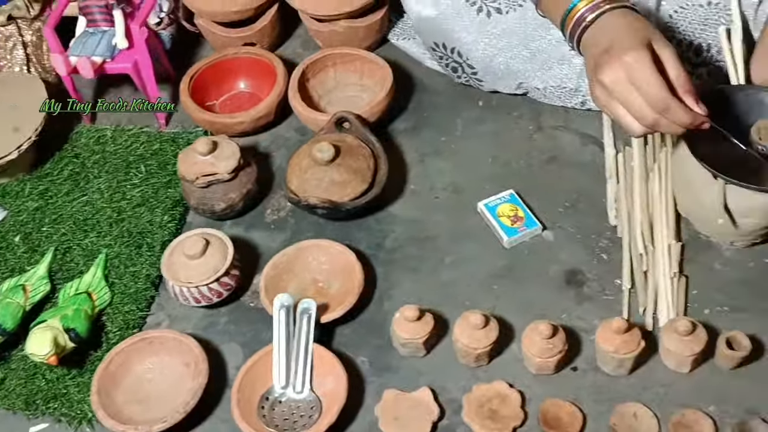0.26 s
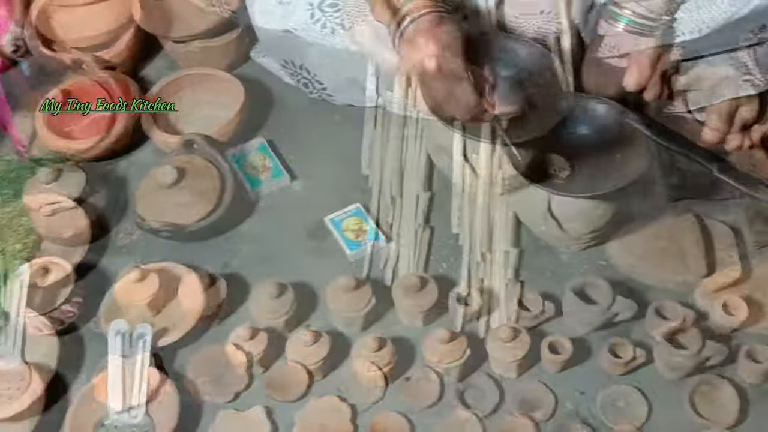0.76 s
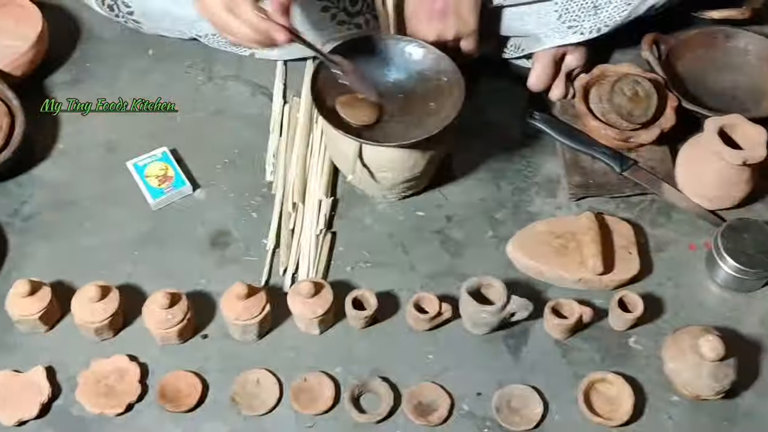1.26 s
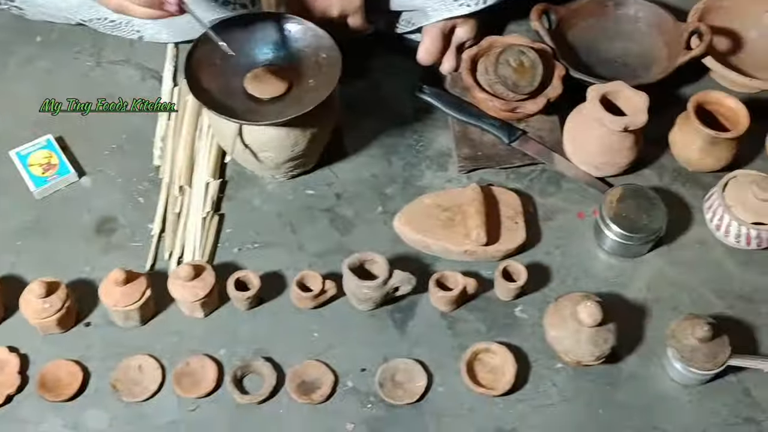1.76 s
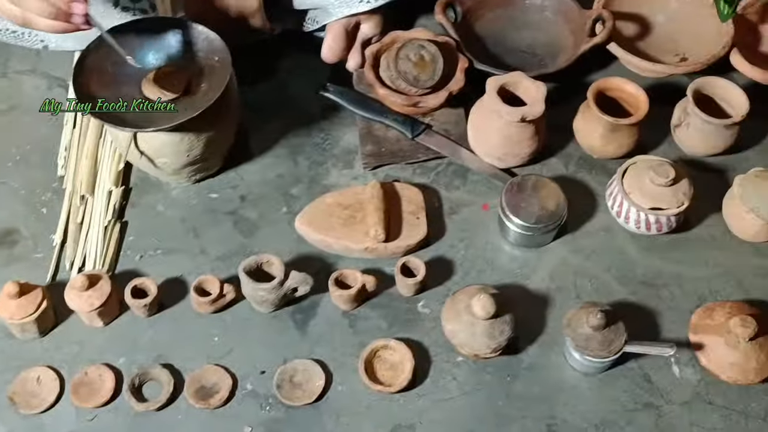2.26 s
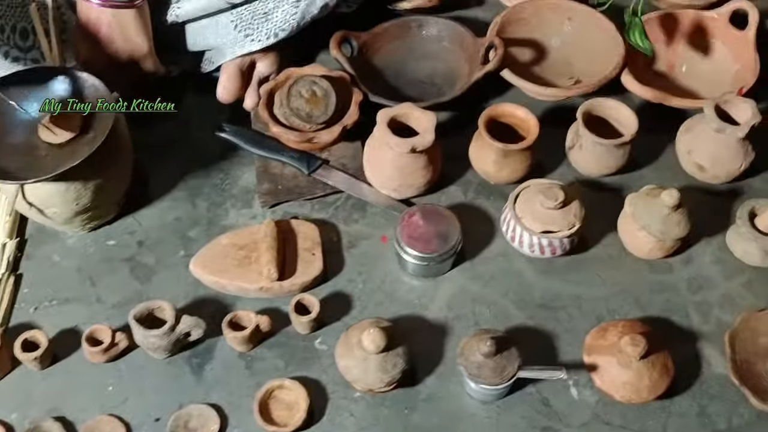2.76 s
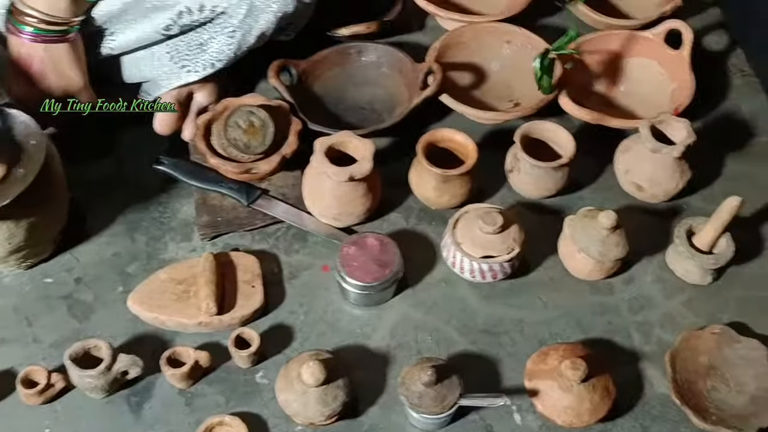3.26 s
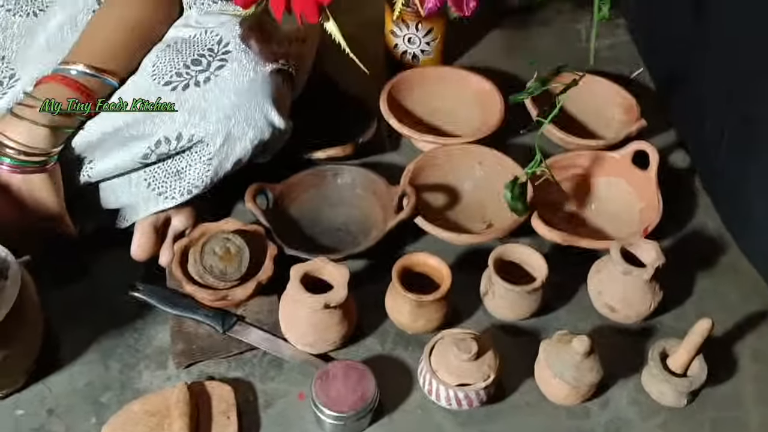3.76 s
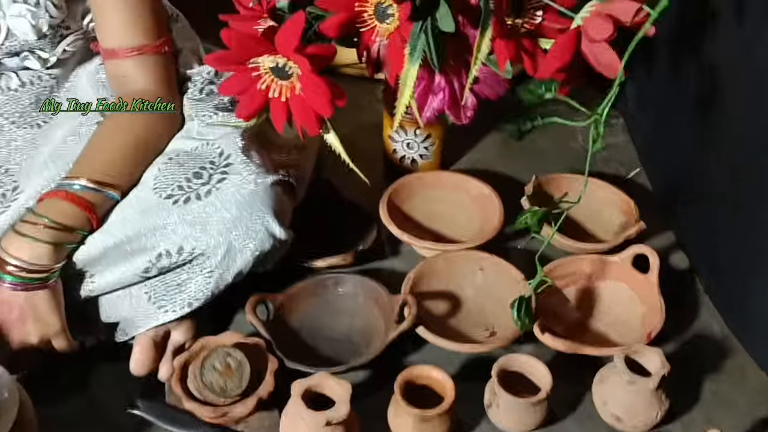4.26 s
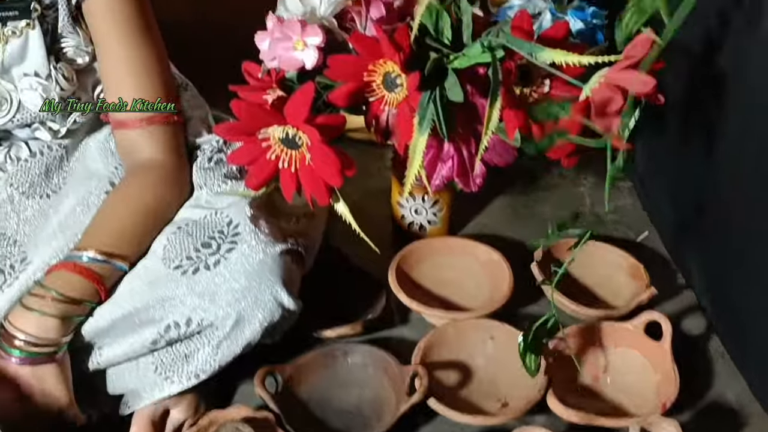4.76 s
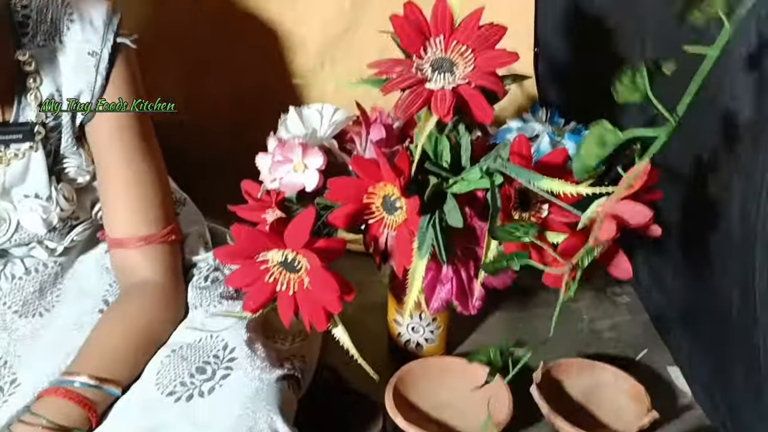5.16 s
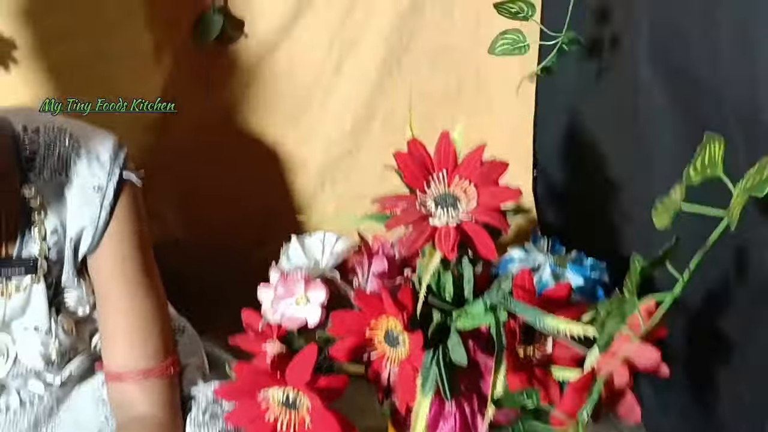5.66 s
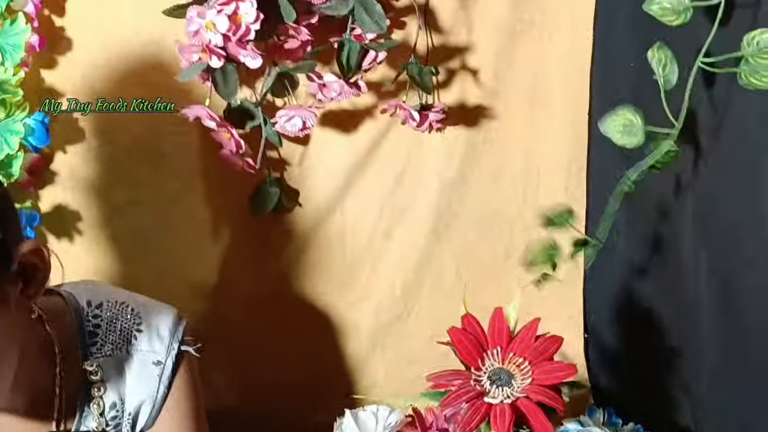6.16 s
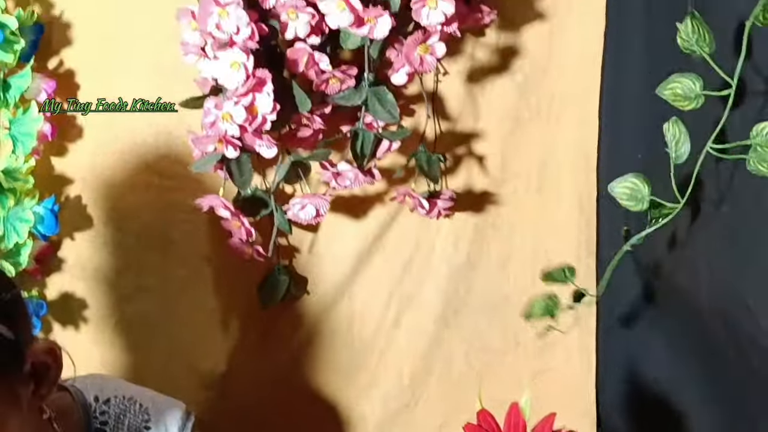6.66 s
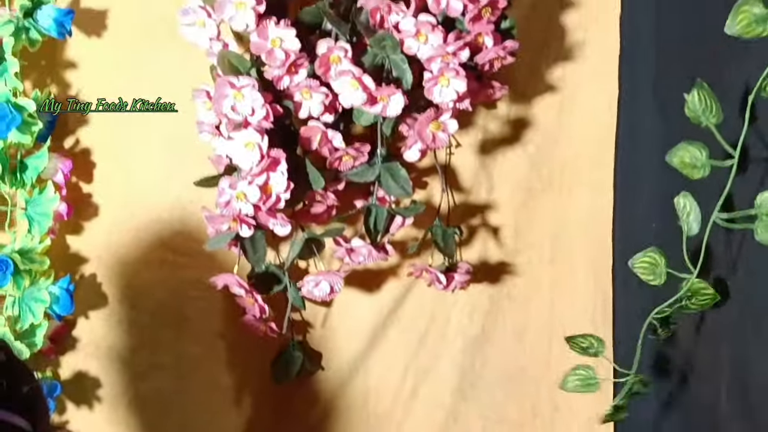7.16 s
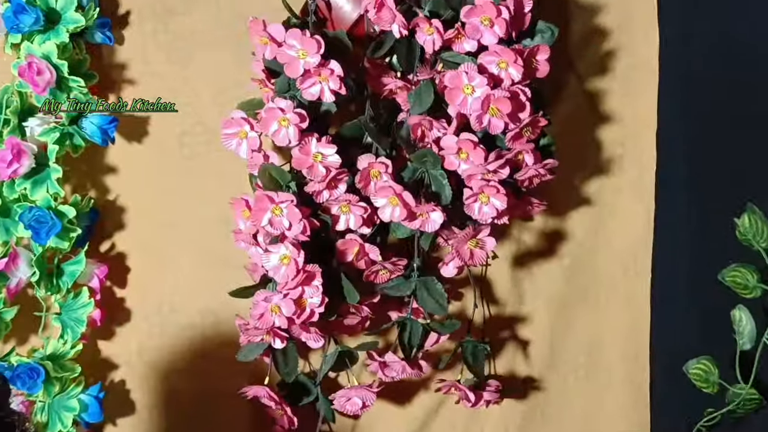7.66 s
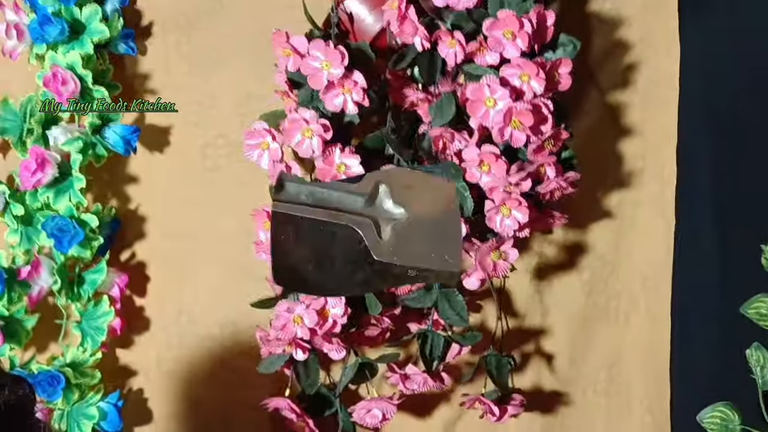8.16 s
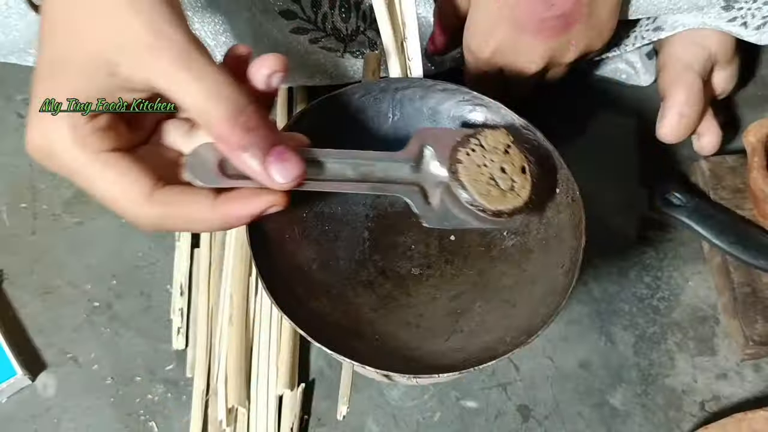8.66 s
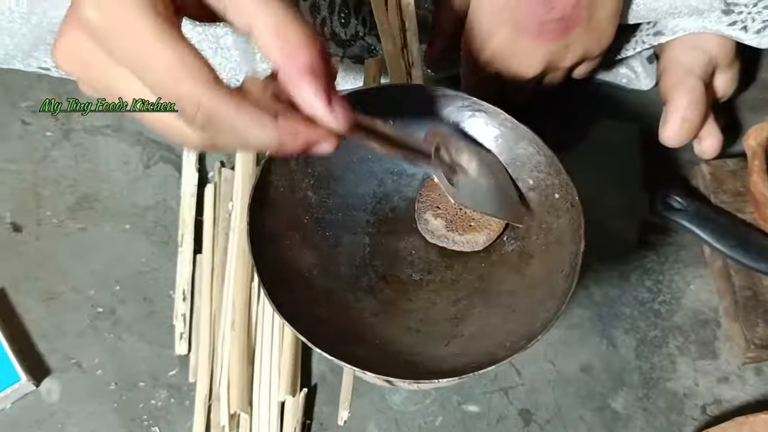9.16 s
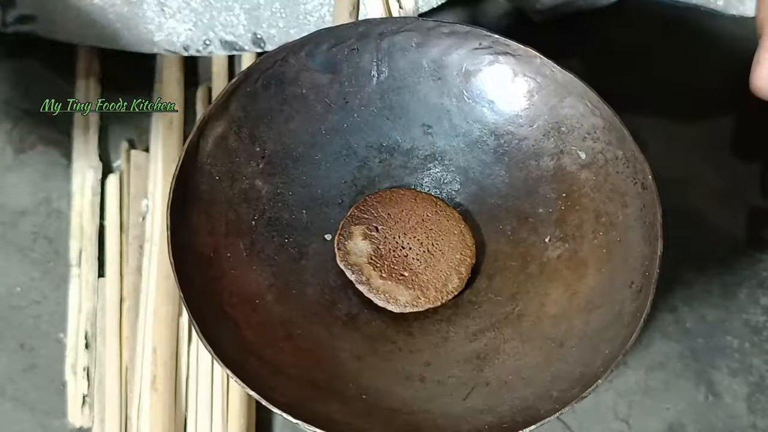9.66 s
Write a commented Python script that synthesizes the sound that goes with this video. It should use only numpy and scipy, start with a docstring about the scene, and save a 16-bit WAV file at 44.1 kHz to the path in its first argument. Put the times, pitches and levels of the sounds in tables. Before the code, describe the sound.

Close to the microphone, a small steel spatula turns a tiny flatbread in a miniature iron wok. Sharp taps and short gritty scrapes come in irregular little groups, some followed by thin high rings that stop short. Faint bangle tinkles, soft low bumps and two quiet squeaks near the end lie over dull, drifting noise in a quiet room with very brief reflections.

```python
"""A small steel spatula turns a tiny flatbread in a miniature iron wok, close to the microphone in a quiet kitchen.
Each touch is a burst of tiny slips that rattles blade and bowl through their short-lived modes.
When the blade lifts, the metal rings on in slowly dying tones until they fade or stop short.
Bangles tinkle faintly as decaying tones, and something squeaks twice with a fluttering, falling tone.
A few soft bumps are brief low swings, and dull, drifting noise lies behind everything."""
import sys
import numpy as np
from scipy import signal
from scipy.fft import rfft, irfft
from scipy.io import wavfile
from scipy.ndimage import uniform_filter1d

SR = 44100
rng = np.random.default_rng(int(sys.argv[2]) if len(sys.argv) > 2 else 0)


def put_to_file(sound):
    """Save the sound as 16-bit audio at rate SR, in the file named by the first command-line argument."""
    columns = np.atleast_2d(sound).T  # one column per channel
    safe = np.clip(columns, -1, 1)
    whole_steps = np.round(safe * 32767)
    wavfile.write(sys.argv[1], SR, whole_steps.astype(np.int16))


N = 437464  # length in samples

# Steady background noise, strongest in the lows, with faint humps higher up.
# Each row: frequency in Hz, relative level in dB per Hz.
BACKGROUND_SPECTRUM = [(12, -30), (20, 3.5), (74, -2), (187, -10.5), (780, -13.5), (1090, -13),
                       (1290, -19.5), (1570, -21), (2910, -35), (3840, -31), (4940, -40.5), (6540, -28),
                       (7730, -36), (9140, -31.5), (16000, -35.5)]
BACKGROUND_LEVEL_DB = -63.5

# Times when the metal rings free. Each row: start in seconds, time the free ring ends in seconds,
# dying time from then on in seconds, level in dB, pitch favoured by the place of contact in Hz,
# fall-off towards other pitches in dB per octave.
FREE_RINGS = [(0, 0.246, 0.04, -33, 2540, 8), (1.004, 1.249, 0.014, -43.5, 6900, 90.5),
              (1.502, 1.875, 0.049, -21.5, 7450, 26), (3.113, 3.279, 0.019, -34, 8700, 134),
              (3.619, 3.8, 0.015, -43, 8700, 130), (4.15, 4.624, .023, -46.5, 3810, 29),
              (4.424, 4.643, .014, -36, 8700, 137), (4.77, 4.996, 0.014, -31, 8700, 105.5),
              (6.18, 6.37, 0.017, -30.5, 8700, 106.5), (6.684, 6.835, 0.017, -40.5, 8820, 48),
              (7.251, 7.367, .003, -53, 7030, 77), (7.555, 7.876, .02, -49, 4400, 38),
              (7.923, 8.054, 0.015, -38, 8700, 56.5), (8.839, 8.9, .02, -55.5, 6040, 44),
              (9.158, 9.252, .016, -43, 8700, 40), (9.486, 9.657, .001, -33, 7140, 19.5)]
# Tones of the free metal; close pairs beat. Each row: frequency in Hz, relative level in dB,
# time to fall by 60 dB in seconds.
FREE_MODES = [(2370, -5, .4), (3735, 1, 1.3), (5183, -5, 0.89), (5287, -2, 0.64), (6886, 1, 1),
              (6940, -12, 1.2), (8734, 1.5, .33)]

# Sharp landings of the blade. Each row: start in seconds, contact in seconds, strength in dB,
# brightness of blade over bowl in dB, thud of the wok on its stove in dB.
TAPS = [(.91, .014, -48, 24.5, -7.5), (1.327, .011, -46, 11, -12.5), (1.491, .014, -41, 18.5, -7),
        (1.965, 0.014, -40, -38.5, -13.5), (2.589, 0.003, -34, -4.5, -16), (2.605, .004, -34, -10.5, -15),
        (2.884, .006, -64.5, 9.5, 3), (3.12, .0014, -26.5, 2.5, -12), (4.142, .011, -35.5, 5.5, -19.5),
        (4.391, 0.012, -33.5, 10.5, -21), (4.777, .012, -31.5, 11, -15.5), (5.284, 0.014, -47.5, 7.5, -7),
        (6.12, .008, -37, 20.5, -11.5), (6.614, .009, -36, 17.5, -8.5), (7.191, .036, -38.5, 17.5, -10.5),
        (7.559, .005, -26.5, 8.5, -24), (7.579, .021, -30.5, -6, -7), (8.741, 0.013, -40, 11, -14.5),
        (9.1555, .002, -31.5, 16.5, -12.5), (9.161, .004, -37.5, 17.5, -11)]
# Pushes of the blade along the iron. Each row: start in seconds, slide in seconds, strength in dB,
# brightness of blade over bowl in dB, thud of the wok on its stove in dB.
SCRAPES = [(.024, 0.033, -46, 14, -17), (.264, 0.0082, -42, 23.5, -16.5), (.35, .019, -41, 7, -30),
           (.373, 0.028, -36, 1.5, -30), (.929, 0.1, -46, 14.5, -16), (1.01, .036, -31.5, 9, -19),
           (1.057, 0.048, -36.5, 1.5, -25), (1.353, 0.016, -44, 13.5, -11), (1.516, 0.053, -34, 7.5, -15.5),
           (2.069, 0.034, -38.5, 7.5, -4.5), (2.111, 0.028, -37, -6.5, -11.5), (3.413, .008, -75, 21, -2.5),
           (3.611, 0.0044, -24, -0.5, -4), (4.162, 0.0069, -32, -10, -24), (4.192, 0.0044, -30, 3, -25),
           (4.416, 0.013, -26.5, 2.5, -19.5), (4.796, 0.016, -29.5, 6.5, -24.5),
           (5.325, 0.01, -63.5, 17, -4), (5.695, 0.019, -51.5, -8, -8), (6.137, 0.043, -29.5, 10.5, -12),
           (6.63, 0.022, -33.5, 6, -9), (6.664, 0.033, -31.5, 9.5, -23), (7.234, 0.011, -32.5, 12.5, -20.5),
           (7.257, 0.018, -38, 8.5, -17.5), (7.917, 0.0073, -38, 13, -8), (8.842, 0.018, -65.5, 19.5, -18),
           (9.468, .03, -34, 5, -18.5), (9.518, 0.013, -27.5, 6, -23)]
TAP_PRESS_S, SCRAPE_PRESS_S = 0.0025, 0.013  # time for the force to build
TAP_CHOKE_S, SCRAPE_CHOKE_S = 0.04, 0.053  # time for hand and food to still the rattle
# Zones of the metal's sound, from low to high: thud, bowl, clank, edge, blade, tip.
# Each row: level in a tap in dB, level in a scrape in dB, share of the brightness in dB per dB.
ZONES = [(-2, -0.5, 0.061), (-1, 0, 0.0045), (-15, -15.5, 0.22), (-16.5, -11, 0.89), (1.5, 1, 0.83),
         (-2, -3.5, 1.1)]
# Borders between neighbouring zones, from low to high. Each entry: frequency in Hz.
ZONE_EDGES_HZ = [275, 800, 1700, 4500, 8000, 12500]
# Short-lived modes of blade and bowl while they touch. Each row: frequency in Hz, width in Hz,
# relative level in dB (before weighting by the width).
CONTACT_MODES = [(382, 66, -8), (600, 99, -13), (788, 31, -12.5), (1023, 28, -4), (1114, 37, 2),
                 (1254, 89, -8), (1910, 55, -13.5), (2330, 50, -11.5), (2490, 35, -11.5), (2867, 19, -31),
                 (4830, 21, -14), (5990, 180, -2.5), (6775, 22, -3), (8770, 55, -5.5), (8960, 34, -3.5),
                 (9520, 130, 0.5), (10300, 55, 5.5), (10850, 50, -0.5), (10840, 35, 0.5), (11890, 35, 5),
                 (12140, 50, 3.5), (13230, 35, 0), (14200, 160, 3), (15200, 45, -2.5), (15190, 32, -7)]
# The crowd of weaker modes between them. Each row: frequency in Hz, relative level in dB per Hz.
CROWD_SPECTRUM = [(88, -68.5), (150, -32), (376, -21), (871, -7.5), (1120, 0), (1530, -30.5), (1940, -13.5),
                  (2920, -20), (4860, -19.5), (6020, -6.5), (7920, -20.5), (10600, -6.5), (13200, -7.5),
                  (14200, -3), (16000, -17)]

# Dull bumps and knocks. Each row: start in seconds, frequency in Hz, level in dB, length in seconds.
BUMPS = [(0.096, 113, -40.5, 0.015), (0.259, 63.6, -35.5, 0.048), (1.869, 40.5, -40.5, 0.055),
         (2.157, 70, -48, 0.056), (3.33, 166, -57.5, 0.043), (4.683, 758, -47.5, 0.041),
         (8.72, 34.4, -44.5, 0.078), (9.247, 297, -52, 0.031), (9.48, 58, -43.5, 0.047)]

# Landings where one short-lived mode swings most. Each row: start in seconds, frequency in Hz,
# relative level in dB, time to fall by 60 dB in seconds.
PINGS = [(0.263, 6015, -31.5, 0.07), (0.922, 8640, -32, 0.13), (0.977, 1175, -33, 0.25),
         (1.359, 6110, -41, 0.088), (2.883, 2480, -54.5, 0.048), (3.609, 5920, -19, 0.043),
         (4.187, 5985, -29, 0.082), (5.291, 2910, -44.5, 0.072), (6.122, 5200, -28, 0.06),
         (9.156, 2615, -29, 0.059), (9.163, 1308, -40.5, 0.15), (9.165, 10540, -27.5, 0.14)]

# Touches between bangles. Each row: time in seconds, relative peak level in dB.
TINKLES = [(0.6857, -41.5), (0.7576, -44.5), (5.4164, -47), (5.4993, -40), (5.549, -39.5), (5.9554, -39.5),
           (6.079, -32), (6.442, -36), (7.1385, -53.5), (8.2375, -39), (9.0544, -38.5)]
# Tones of the bangles. Each row: frequency in Hz, relative level in dB, time to fall by 60 dB in seconds.
BANGLE_MODES = [(9630, -5, .08), (10920, 18, 0.055), (10900, -3, 0.049), (12230, 3, .08), (12800, 0.5, .07),
                (14100, -7, 0.039), (15450, -3, .06)]

# Soft squeaks. Each row: start in seconds, length in seconds, pitch in Hz, level in dB,
# overtone level against the tone in dB.
SQUEAKS = [(8.139, .092, 1457, -40, -25), (8.264, .085, 1438, -47, -30)]

# Reflections that reach the two ports differently. Each row: frequency in Hz,
# level against the direct sound in dB.
SIDEWAYS_SPECTRUM = [(2500, -49.5), (4500, -13.5), (6500, -14), (9000, -18.5), (15000, -29.5)]

CUTOFF_HZ = 15900


def amp(db):
    """Decibels to gain."""
    return 10 ** (np.asarray(db) / 20)


def unit(x):
    """Scales to rms 1."""
    return x / np.sqrt(np.mean(x ** 2) + 1e-20)


def smooth_random(noise, first, second):
    """Two running averages turn noise into a gentle random curve of rms 1."""
    return unit(uniform_filter1d(uniform_filter1d(noise, size=first), size=second))


def read(points, hz):
    """Reads a spectrum on a log-frequency axis."""
    f, value = np.transpose(points)
    return np.interp(np.log(hz + 1), np.log(f + 1), value)


def add(mix, s, sound):
    """Mixes a sound in at time s."""
    part = mix[..., max(round(s * SR), 0):][..., :sound.shape[-1]]
    part += sound[..., :part.shape[-1]]


def background(patch_db=3.1, swell_db=0.3):
    """Dull background noise whose level drifts in patches of pitch and time."""
    hz, _, z = signal.stft(rng.standard_normal(N), SR, nperseg=1024, noverlap=768)
    patches = rng.standard_normal(z.shape)
    for axis in (0, 1):
        patches = uniform_filter1d(patches, size=10, axis=axis)
    swell = unit(uniform_filter1d(rng.standard_normal(z.shape[1]), size=40))
    level_db = read(BACKGROUND_SPECTRUM, hz)[:, None] + patch_db * unit(patches) + swell_db * swell
    noise = signal.istft(z * amp(level_db), nperseg=1024, noverlap=768)[1][:N]
    return amp(BACKGROUND_LEVEL_DB) * unit(noise)


def ringing(swell_s=0.003, wobble_db=2.5, buzz_db=-22):
    """Free modes near the favoured pitch wobble and buzz in the hand until they fade or stop short."""
    t, out = np.arange(SR) / SR, np.zeros(N)
    for s, end, dying, ring_db, favoured_hz, falloff_db in FREE_RINGS:
        swell = 1 - np.exp(-t / swell_s)
        free = swell * np.exp(-np.maximum(t - (end - s), 0) / dying)
        for hz, db, t60 in FREE_MODES:
            slow, fast = rng.standard_normal((2, SR))
            wobble = smooth_random(slow, 900, 400)
            buzz = 1 + amp(buzz_db) * smooth_random(fast, 160, 100)
            place_db = -falloff_db * abs(np.log2(hz / favoured_hz))
            level = amp(ring_db + place_db + db - 60 * t / t60 + wobble_db * wobble) * buzz
            tone = np.sin(2 * np.pi * (hz * t + rng.random()))
            add(out, s, np.sqrt(2) * level * free * tone)
    return out


def touches():
    """Taps land fast, scrapes press in slowly; a steep blade brightens the sound, weight on the wok adds a thud."""
    tap_db, scrape_db, lean = np.transpose(ZONES)
    taps = TAPS, TAP_PRESS_S, TAP_CHOKE_S, tap_db
    scrapes = SCRAPES, SCRAPE_PRESS_S, SCRAPE_CHOKE_S, scrape_db
    for rows, press, choke, colour_db in (taps, scrapes):
        for s, slide, strength_db, bright_db, thud_db in rows:
            zone_db = strength_db + colour_db + lean * bright_db
            zone_db[0] += thud_db
            yield s, slide, press, choke, zone_db


def slips(t, slide, press, per_s=1300, spread_db=3, rub_db=-9, press_db=20, ease_db=3, release_s=0.0053):
    """Tiny stick-slip clicks and fine rubbing under a force that builds, eases and lets go."""
    force_db = press_db * np.minimum(t / press, 0) - ease_db * np.clip(t / slide, 0, 1)
    force = amp(force_db) * np.exp(-np.maximum(t - slide, 0) / release_s)
    happens = rng.random(len(t)) < per_s / SR
    size = amp(spread_db * rng.standard_normal(len(t)))
    clicks = happens * size * rng.choice([-1, 1], len(t))
    rub = amp(rub_db) * rng.standard_normal(len(t))
    return force * (unit(clicks) + rub)


def landing_noise(t, db=-11, rise_s=0.0027):
    """A short burst of noise around the landing swells up to it and fades after."""
    return amp(db) * np.exp(-abs(t) / rise_s) * rng.standard_normal(len(t))


def contact_response(size, crowd_db=-3, crowd_t60=0.092, place_db=5.5, uneven_db=5, shift=0.76):
    """Spectrum of one click on the metal; the place of contact weights the modes anew each time."""
    t, bins = np.arange(size) / SR, np.fft.rfftfreq(size, 1 / SR)
    modes = 0
    for hz, width, db in CONTACT_MODES:
        # each pitch shifts a little, in half-widths of its mode
        drift = np.pi * width * shift * rng.standard_normal() * t
        swing = np.sin(2 * np.pi * (hz * t + rng.random()) + drift)
        level = amp(db + place_db * rng.standard_normal()) * width
        modes = modes + level * np.exp(-np.pi * width * t) * swing
    clusters = smooth_random(rng.standard_normal(len(bins)), 90, 50)
    crowd_gain = amp(read(CROWD_SPECTRUM, bins) + uneven_db * clusters)
    crowd = irfft(rfft(rng.standard_normal(size)) * crowd_gain)
    crowd = unit(crowd * amp(-60 * t / crowd_t60))
    return rfft(unit(modes) + amp(crowd_db) * crowd)


def spatula(size=12288, blow=9, quick_s=0.0015, settle_s=0.0011):
    """Every touch: a blow and a slide excite the metal; angle and grip set the weight of each zone."""
    hz, out = np.fft.rfftfreq(size, 1 / SR), np.zeros(N)
    below = [1 / (1 + (hz / edge) ** 16) for edge in ZONE_EDGES_HZ]
    below.append(np.ones(len(hz)))
    zones = np.diff(below, axis=0)  # one band between each pair of neighbouring edges, and one above
    for s, slide, press, choke, zone_db in touches():
        lead = round(np.clip(s, 0, 0.03) * SR)  # samples kept ahead of the landing
        t = (np.arange(size) - lead) / SR
        drive = slips(t, slide, press) + landing_noise(t)
        drive[lead] += blow * np.exp(-(press / quick_s) ** 2 / 2)  # only a quick landing strikes
        parts = irfft(rfft(drive) * contact_response(size) * zones)
        strength = parts[:, lead:lead + round((slide + settle_s) * SR)].std(axis=1)
        # hand and food choke the rattle after the slide
        grip = np.exp(-(np.maximum(t - slide, 0) / choke) ** 4)
        add(out, s - lead / SR, grip * ((amp(zone_db) / strength) @ parts))
    return out


def bumps():
    """Dull, soft knocking: a low tone swells and fades within moments."""
    out = np.zeros(N)
    for s, hz, db, length in BUMPS:
        t = np.arange(round(length * SR)) / SR
        add(out, s, amp(db) * np.hanning(len(t)) * np.sin(2 * np.pi * hz * t))
    return out


def pings(rise_s=0.0031):
    """Single modes stand out of a touch for a moment, then die away."""
    t, out = np.arange(SR // 4) / SR, np.zeros(N)
    for s, hz, db, t60 in PINGS:
        level = amp(db - 60 * t / t60) * (1 - np.exp(-t / rise_s))
        add(out, s, level * np.sin(2 * np.pi * (hz * t + rng.random())))
    return 2 * out


def bangles(level_db=-8, jostle_s=0.0073, press_s=0.0044, detune=0.019, vary_db=4, rub_db=-10):
    """Thin rings jostle and rub on a wrist; tiny slips set off their high, short tones."""
    t, out = np.arange(SR // 5) / SR, np.zeros(N)
    high_pass = signal.butter(4, 9000, "high", fs=SR, output="sos")
    for s, db in TINKLES:
        ring = 0
        for hz, mode_db, t60 in BANGLE_MODES:
            level = amp(mode_db + vary_db * rng.standard_normal() - 60 * t / t60)
            ring = ring + level * np.sin(2 * np.pi * hz * rng.normal(1, detune) * t)
        drive = slips(t - 2 * press_s, jostle_s, press_s)
        rub = signal.sosfilt(high_pass, drive)
        tinkle = unit(signal.fftconvolve(drive, ring)[:len(t)]) + amp(rub_db) * unit(rub)
        add(out, s - 2 * press_s, amp(db + level_db) * 2 * tinkle / abs(tinkle).max())
    return out


def squeaks(waver_hz=35, flutter=0.44, sag_hz=50, overtone_band_hz=(3100, 4300)):
    """A fluttering, slightly falling tone with a rasp of band-limited noise above it."""
    out = np.zeros(N)
    band = signal.butter(4, overtone_band_hz, "band", fs=SR, output="sos")
    for s, length, hz, db, over_db in SQUEAKS:
        n = round(length * SR)
        waver = smooth_random(rng.standard_normal(n), 80, 60)
        shake = smooth_random(rng.standard_normal(n), 80, 60)
        pitch = hz + waver_hz * waver + sag_hz * np.linspace(1, -1, n)
        tone = np.sin(2 * np.pi * np.cumsum(pitch) / SR) * (1 + flutter * shake)
        rasp = signal.sosfilt(band, rng.standard_normal(n))
        squeak = unit(tone) + amp(over_db) * unit(rasp)
        add(out, s, amp(db) * squeak * signal.windows.tukey(n, 0.5))
    return out


def room(x, t60=0.067):
    """Brief reflections from floor and pots add to one port what they take from the other."""
    t = np.arange(SR // 8) / SR
    echoes = rng.standard_normal(len(t)) * amp(-60 * t / t60)
    gain = amp(read(SIDEWAYS_SPECTRUM, np.fft.rfftfreq(len(t), 1 / SR)))
    echoes = irfft(rfft(echoes / np.linalg.norm(echoes)) * gain)
    side = signal.fftconvolve(x, echoes)[:N]
    return np.array([x + side, x - side])


def scene():
    """The wok and the small sounds around it; ringing, bumps and background are the same in both ports."""
    reflected = room(spatula() + pings() + bangles() + squeaks())
    return reflected + ringing() + bumps() + background()


def record(dry, ceiling=0.75):
    """The loudest peaks are rounded off; then a steep filter removes the highest treble."""
    rounded = dry / (1 + (dry / ceiling) ** 6) ** (1 / 6)
    low_pass = signal.firwin(511, CUTOFF_HZ, window=("kaiser", 9), fs=SR)
    return signal.oaconvolve(rounded, low_pass[None], "same")


dry = scene()
out = record(dry)
put_to_file(out)
```